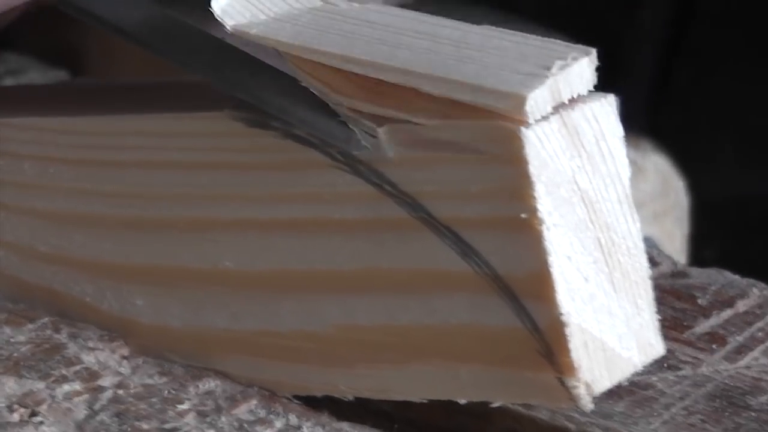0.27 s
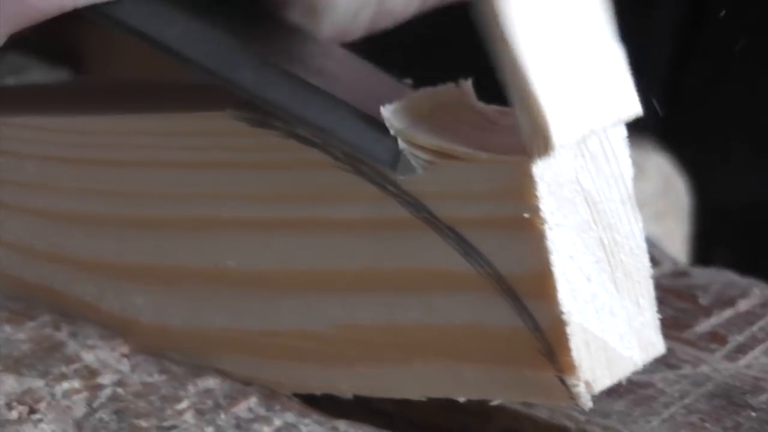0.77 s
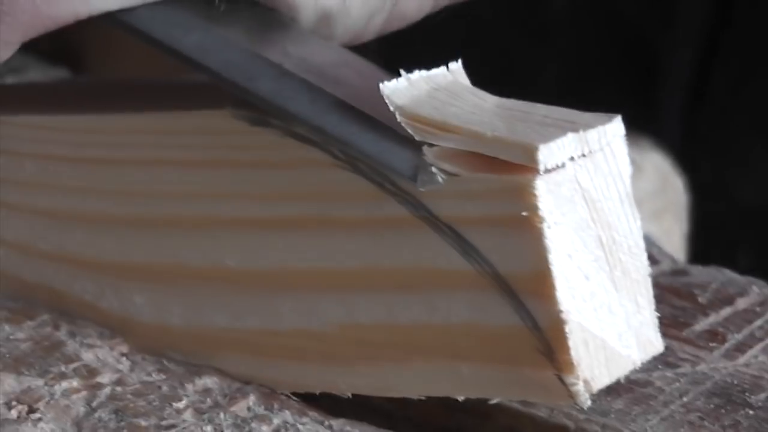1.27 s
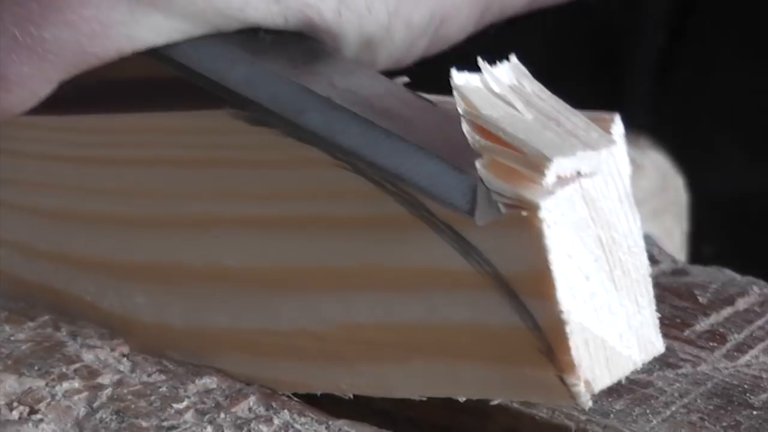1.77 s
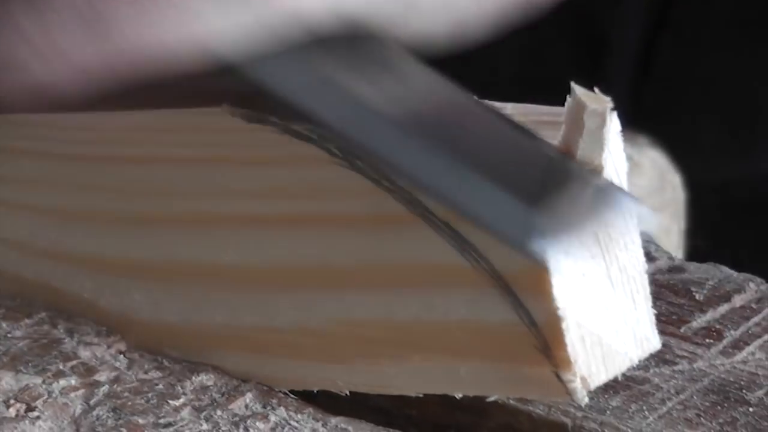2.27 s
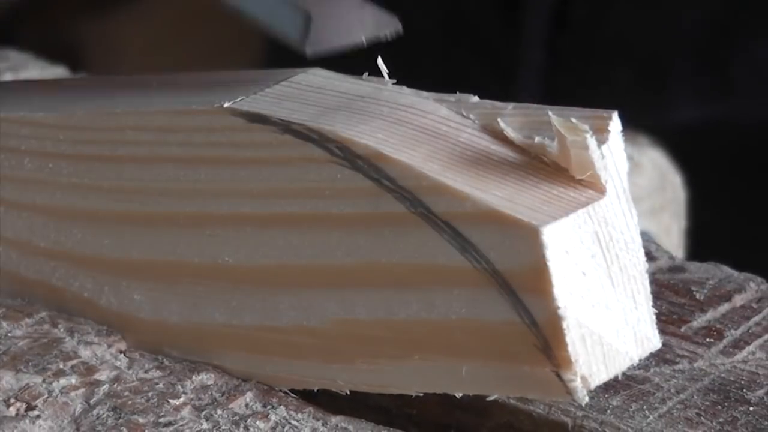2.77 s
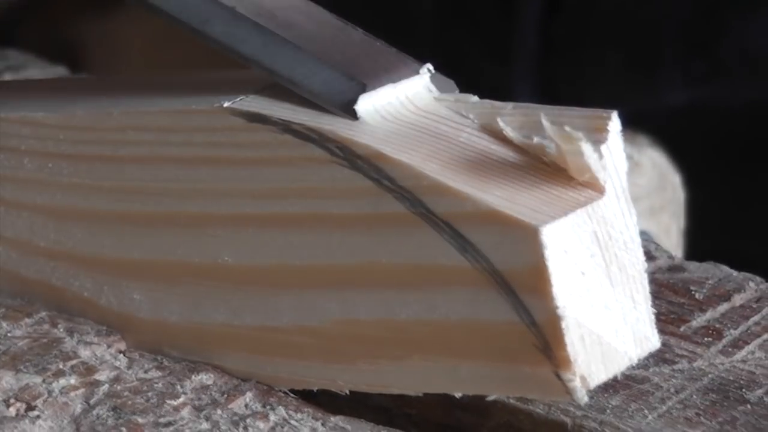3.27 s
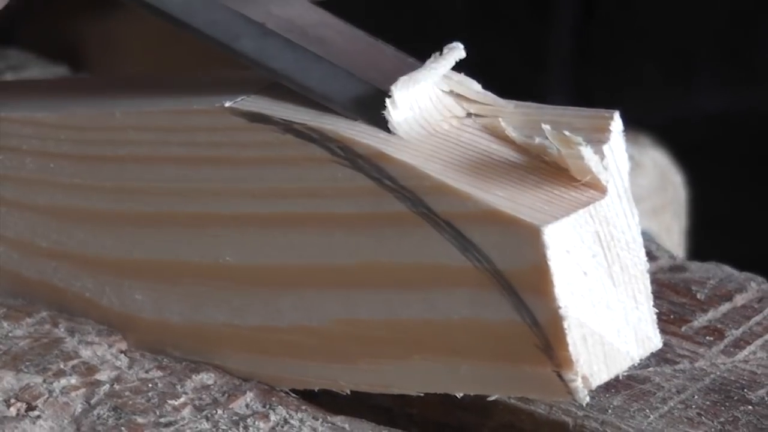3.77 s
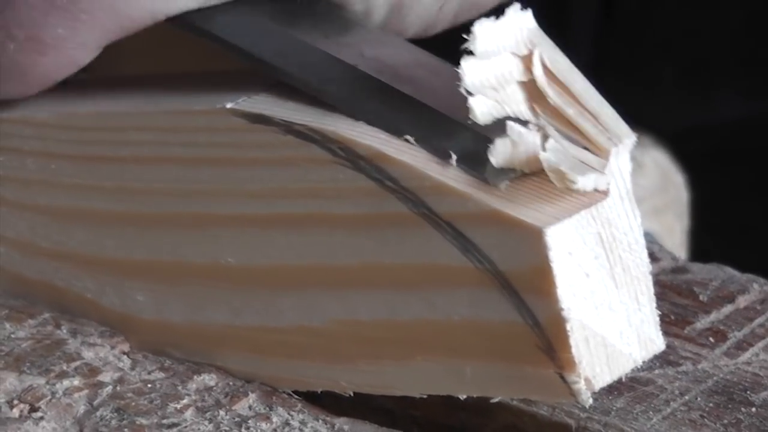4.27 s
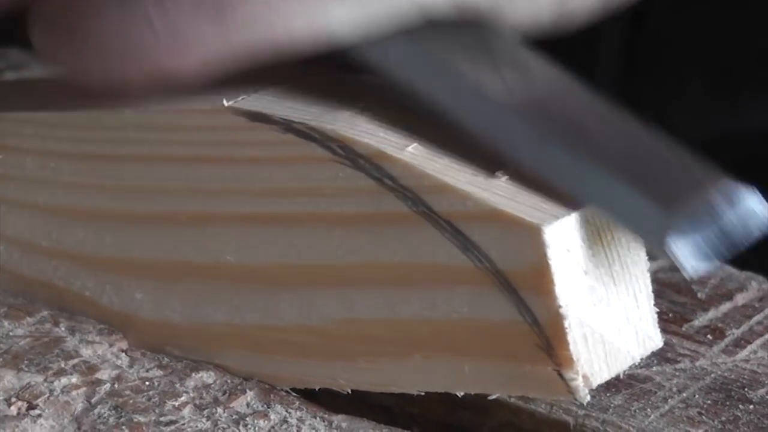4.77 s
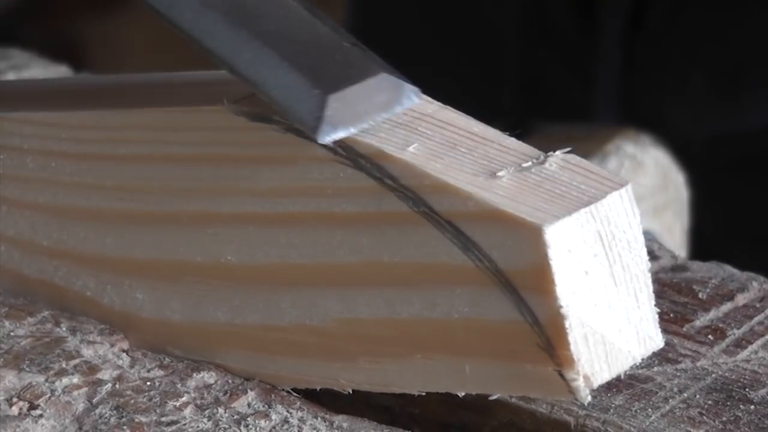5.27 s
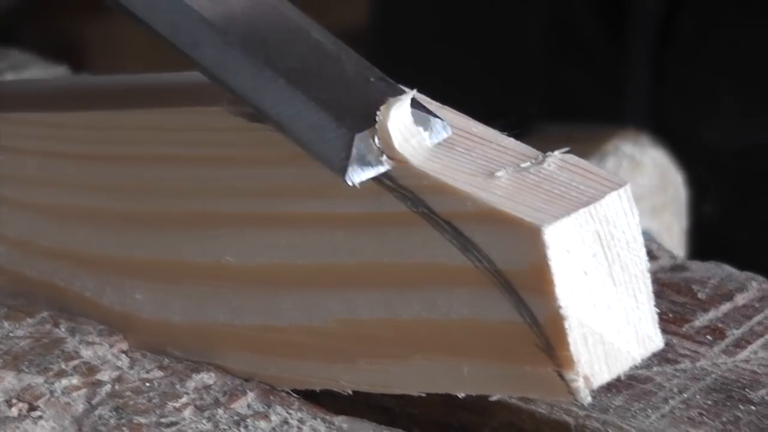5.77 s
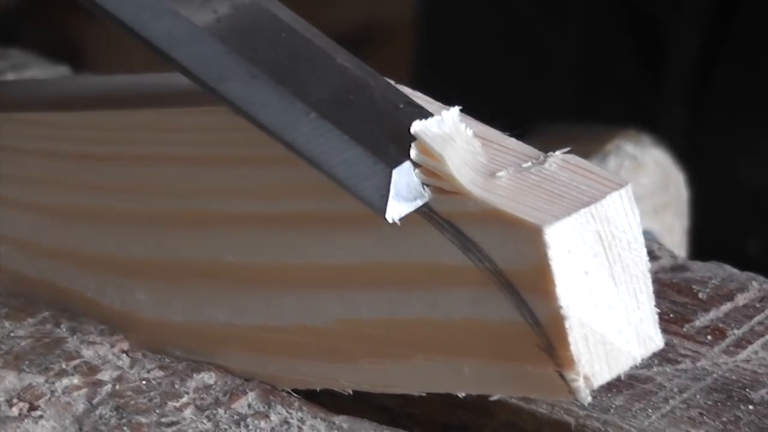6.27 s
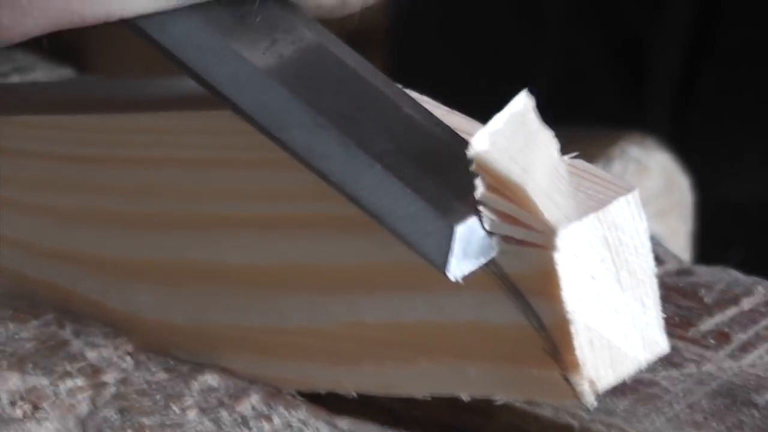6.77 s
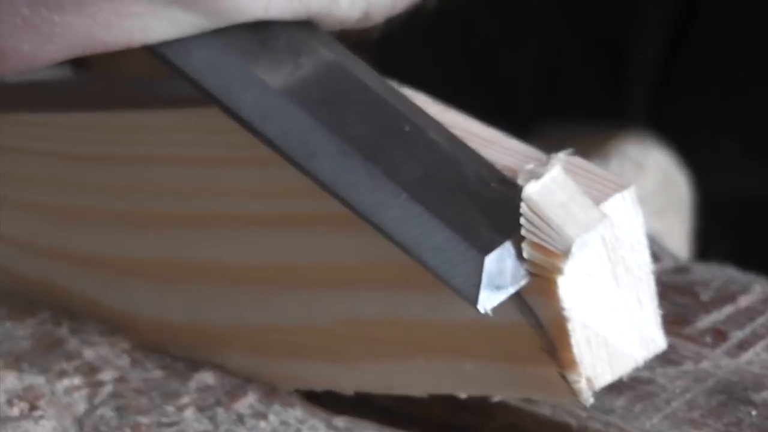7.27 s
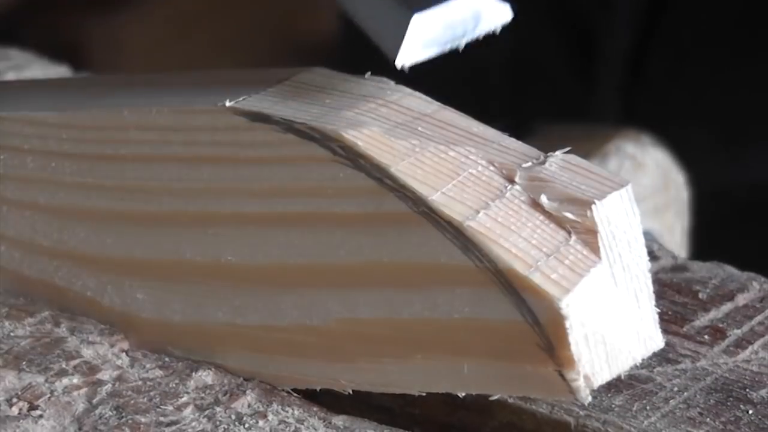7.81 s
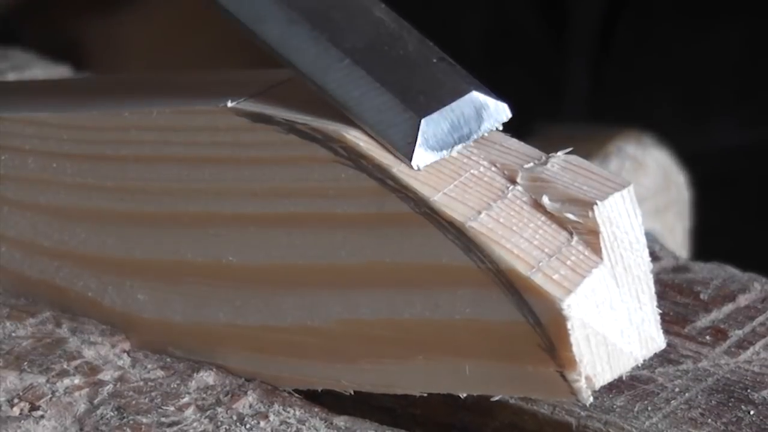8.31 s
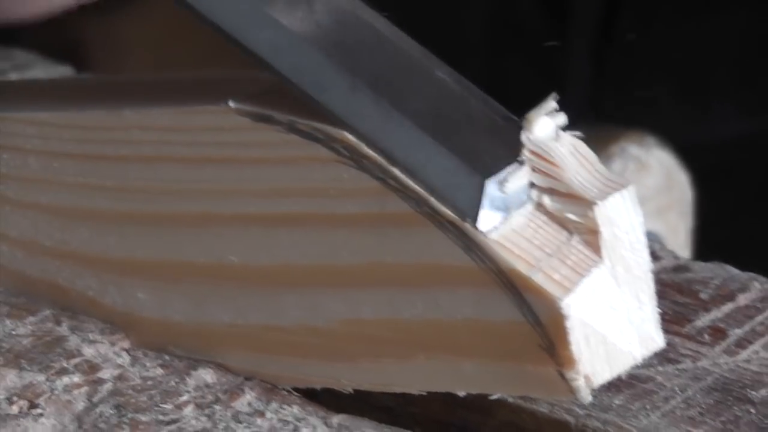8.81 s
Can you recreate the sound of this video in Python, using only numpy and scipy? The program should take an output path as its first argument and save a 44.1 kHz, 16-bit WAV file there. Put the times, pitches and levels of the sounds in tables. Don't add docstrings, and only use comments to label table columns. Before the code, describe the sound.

In a small workshop, heard close in stereo, a mallet drives a chisel through pine. Seven hard blows fall from 0 to 2.1 seconds, roughly every 0.35: sharp splitting crack, steely ring, hollow board and bench knock, short echo. After each, bench legs bump and a loose tool ticks in shortening bounces. A blade tap comes at 2.0, another with rasping around 2.9. Five blows follow from 3.3 to 4.6. In the pause, faint room noise and hum creep up, with soft scraping, chips ticking and a blade tap at 5.2. Six blows run from 5.75 to 7.5, with heavier rattling. At 7.9 a block lands with a softer, rounder wooden knock; the blade taps, squeaks and rasps until 8.4. Two last blows hit at 8.5 and 8.8, with bench thuds, small rattles and a fading echo.

```python
import sys
import numpy as np
from scipy import signal
from scipy.fft import rfft, irfft, next_fast_len
from scipy.io import wavfile
from scipy.ndimage import uniform_filter1d

SR = 44100
rng = np.random.default_rng(int(sys.argv[2]) if len(sys.argv) > 2 else 0)


def voltage_ratio(decibels):
    exponent = np.asarray(decibels, float) / 20
    return 10 ** exponent


def materialize(psi):
    bounded = np.clip(np.atleast_2d(psi).T, -1, 1)
    quanta = np.round(bounded * 32767).astype(np.int16)
    wavfile.write(sys.argv[1], SR, quanta)


N = 399105

# start_s, crack_db, bench_db, lingering_board_hz, lingering_board_db
BLOWS = [(0.0135, -9, -18.5, 2020, -6), (0.3626, -4.5, -27, 1176, -2), (0.7199, -7, -19, 1405, -1.5),
         (1.071, -10, -24, 1397, -1.5), (1.4042, -8, -24.5, 1160, -1), (1.7363, -9.5, -24, 1400, -5),
         (2.0994, -7, -29, 1480, -5), (3.2904, -7, -22, 1950, -6.5), (3.6062, -7.5, -27, 1440, -3.5),
         (3.931, -6, -31.5, 1400, 2.5), (4.2583, -6.5, -22.5, 1500, -8), (4.5981, -7.5, -40, 640, -17),
         (5.7531, -6, -20.5, 748, -5.5), (6.118, -6, -20, 2214, -4.5), (6.4701, -6, -20.5, 1400, -7),
         (6.812, -6, -18, 1700, -5), (7.1523, -5.5, -19.5, 1386, 1), (7.5049, -6, -21, 606, -8),
         (8.502, -6, -19, 1670, -0.5), (8.831, -4.5, -20, 1285, 1.5)]
# board_db, steel_db
LANDING = [(0.9, 3.5), (-1.3, 0.7), (2, -5.5), (-2.2, 2.5), (-0.5, 2.2), (-0.2, -0.8), (-1.5, 0.3),
           (1.5, -2.3), (-0.5, -1.5), (-1.5, -2), (-0.3, -1), (-1.6, -2.5), (0.3, -1), (0.3, -1), (0.1, 1),
           (-2.5, -1), (-3, 1.8), (-1.2, 2.2), (1, 0.8), (-2, -1.7)]
# start_s, level_db, bench_db, steel_rel_db, thump_db
TOUCHES = [(1.0567, -18.5, -23, 4.5, -46), (2.0145, -22, -24, 0, -68), (2.9609, -20, -23.5, 10.5, -35.5),
           (5.2048, -28, -17.5, 5, -77), (7.89, -26.5, -22, -1, -67), (8.1437, -30, -21, 15, -42)]

# centre_hz, width_hz, level_db
BENCH = [(108, 64, -3), (176.6, 38, 2), (216, 49, 1.5), (283.6, 35, -5), (342.4, 67, 6.5), (437, 245, 8),
         (467, 44, 4), (530, 68, -3)]
BOARD = [(761, 306, 3.5), (1004, 140, -1.5), (1346, 278, 6), (1616, 170, 2), (1951, 150, 1.5)]
HANDLE = [(2262, 310, -3.5), (2714, 680, -2.5), (3446, 860, -0.5), (4660, 1600, -5.5)]
STEEL = [(4900, 1350, -6), (6030, 1200, -7), (8100, 3530, -0.5), (9500, 1900, -13.5), (10920, 940, -9.5)]
BLOCK = [(198, 100, 3), (310, 270, -5), (520, 214, 2.5), (660, 94, 3), (1090, 85, -1), (1910, 210, -5),
         (2600, 130, -7), (4360, 2500, -26)]
# pitch_hz, level_db, t60_s
WOOD_MODES = [(166.26, -13, 0.48), (270.5, -9.5, 0.29), (356.5, -3.5, 0.22), (446, -2, 0.29),
              (486.4, -3.5, 0.4), (640, -8.5, 0.27), (746, -5, 0.24), (989, -4.5, 0.32), (1131, -5, 0.22),
              (1272, -12, 0.4), (1397, -8.5, .4), (1670, -8, 0.36), (1906, -8, 0.27), (2320, -9.5, 0.22)]
# start_s, level_db, pitch_hz
STEEL_RINGS = [(0.0144, -36, 4140), (1.056, -7, 5630), (1.2161, -38, 6300), (1.3568, -46, 6250),
               (1.4037, -9.5, 3630), (2.1006, -12, 3550), (2.1894, -31, 6100), (2.2498, -40, 6100),
               (2.3745, -51, 3390), (2.4638, -48.5, 6160), (3.6067, -19.5, 3480), (3.931, -23, 3480),
               (4.5984, -10, 3880), (5.2046, -24.5, 5600), (5.3682, -39, 4900), (5.674, -34, 3540),
               (5.7538, -6.5, 3280), (5.892, -34, 3970), (6.119, -9, 3560), (6.2652, -34, 3800),
               (8.1424, -30.5, 4690)]
# start_s, level_db, pitch_hz
BLADE_RING = [(2.885, -27, 2050), (2.965, -21, 2600), (3.931, -8, 1410), (4.5982, -8, 800),
              (4.5982, -17, 1045), (7.1521, -4, 1400), (0.3625, -10, 770), (2.1001, -8, 2180),
              (2.965, -26, 3080)]

# start_s, level_db
THUDS = [(2.06, -43), (2.414, -67.5), (3.096, -44.5), (3.147, -56), (3.633, -30), (3.956, -22.5),
         (5.609, -43), (5.986, -38), (6.06, -61), (6.343, -35.5), (6.753, -30.5), (6.969, -30),
         (7.067, -42.5), (7.333, -30.5), (7.422, -39), (8.668, -22), (8.992, -27.5)]
# start_s, level_db, pitch_hz
LEG_BUMPS = [(0.149, -45, 203), (0.499, -40, 191), (0.859, -41, 213), (1.218, -42, 202),
             (1.558, -39.5, 226), (1.899, -53, 202), (2.25, -64, 312), (2.885, -35, 300), (3.436, -37, 161),
             (3.536, -39, 310), (3.757, -40, 218), (4.085, -37, 216), (4.409, -36, 205), (5.202, -39, 297),
             (5.892, -30.5, 213), (5.984, -28.5, 202), (6.063, -38, 194), (6.268, -28.5, 216),
             (6.34, -32, 207), (6.62, -32.5, 390), (6.669, -31, 202), (6.753, -32, 198), (6.968, -31, 238),
             (7.331, -36, 200), (7.423, -37, 291), (7.69, -43, 342), (8.113, -32.5, 355), (8.669, -31, 363),
             (8.792, -23, 297), (8.988, -30.5, 199)]
# start_s, level_db, steel_rel_db
FIRST_LANDINGS = [(0.1472, -37.5, 5), (0.4988, -36.5, 6), (0.8614, -46, 15), (1.2167, -39, 5),
                  (1.5592, -42.5, 7.5), (1.8946, -47, 4.5), (2.2507, -43, 1), (3.4376, -40, 4),
                  (3.7594, -38, -5.5), (4.0866, -37.5, 1), (4.4099, -40, 2), (5.891, -33, 1.5),
                  (6.2672, -30.5, 2), (6.6185, -31, 7), (7.6904, -37, 2.5), (8.6852, -40.5, -3)]
SECOND_LANDINGS = [(0.2438, -39, 2.5), (0.603, -41, -3), (0.9637, -41, -1), (1.305, -43.5, -1),
                   (1.6392, -43, -11.5), (1.969, -44, -25), (2.3436, -41, -2), (3.5284, -39.5, 0),
                   (3.8404, -41.5, -4), (4.1634, -41.5, 0), (4.4878, -41.5, 0), (6.0015, -35, -1),
                   (6.3599, -35.5, -0.5), (6.6934, -42, 0), (8.7335, -41.5, -9)]
THIRD_LANDINGS = [(0.322, -45.5, 3), (0.665, -50.5, 3), (1.021, -47, 2), (1.381, -46.5, 2),
                  (3.596, -43.5, -4), (3.916, -42, -2), (4.242, -41.5, 0.5), (4.565, -41, 5),
                  (6.0744, -38, 5.5), (6.432, -38, 1.5), (6.778, -37, 1), (8.7926, -42, -11)]
# start_s, level_db, steel_rel_db
CHIPS = [(0.8774, -40, -14), (1.0516, -28, 3), (1.3565, -41, -16), (1.5864, -42.5, 13), (2.374, -39.5, 4),
         (2.8828, -38, 0), (3.455, -45, -25), (4.9287, -35.5, 4.5), (5.0946, -44.5, 0), (5.199, -41, -13),
         (5.367, -41.5, 1), (5.556, -54, 6), (5.907, -39, 1), (5.987, -45, -3), (6.283, -40, 1),
         (5.656, -39, 0), (5.726, -47, -12), (7.0129, -44, 0), (2.972, -47.5, 6.5), (3.1255, -61, -7),
         (3.2317, -45, -6), (7.3556, -49, -1), (7.4404, -48, -12), (8.4452, -48, -8), (8.1085, -33, -14.5),
         (8.8246, -40, 0.6)]

# start_s,
# hardest_s, end_s, hardest_db
SCRAPE = [(3.09, 3.13, 2.7, -72), (4.75, 4.945, 6.7, -57.5), (5.104, 5.184, 5.2, -59),
          (5.27, 5.353, 5.49, -51.5), (5.643, 5.669, 5.6, -51), (6.9, 6.95, 7.36, -50.5),
          (7.25, 7.3, 7.7, -51.5), (7.75, 7.83, 8.5, -52.5), (7.911, 7.915, 7.92, -39.5),
          (7.974, 8.003, 8.22, -51), (8.22, 8.335, 8.4, -46.5), (8.4, 8.423, 10, -54)]
# start_s, hardest_s, end_s, hardest_db
RASP = [(8.255, 8.29, 8.31, -54), (8.31, 8.34, 8.375, -48.5), (5.65, 5.66, 5.5, -55),
        (3.3, 2.92, 3.25, -48)]
# freq_hz, density_db
SCRAPE_COLOUR = [(150, 7), (400, 11), (1100, 9.5), (3000, -1), (5000, -5.5), (9000, -16.5), (13000, -13.5)]
RASP_COLOUR = [(1500, -18), (3300, 3), (6500, -5), (9300, 4), (12000, -10)]
# start_s, level_db, pitch_hz
SQUEAKS = [(3.436, -27, 4200), (4.409, -33, 4300), (5.326, -34, 3600), (5.526, -36, 1140),
           (8.161, -19.5, 2098), (8.263, -33, 2050), (8.276, -27, 3300), (8.326, -30, 3260),
           (8.331, -29, 2076)]

# freq_hz, t60_s, level_db, direct_side_minus_mid_db
ROOM = [(134, 1, -9.5, -7), (246, 0.89, 4, -13.5), (523, 0.6, -2.5, -6), (960, 0.23, 0.5, -5.5),
        (1790, 0.41, -5, -13), (3720, 0.39, -10, -25), (6400, 0.41, -3, -26), (10700, 0.4, -17, -11)]
# freq_hz, side_minus_mid_db
TAIL_SIDE = [(60, -17), (300, -17.5), (1900, -8), (2500, -19.5), (3000, -48), (10600, -52), (11200, -5),
             (12500, -6)]
# freq_hz, density_db
AIR = [(30, -16), (70, -10), (150, 6.5), (300, -0.5), (1100, -3.5), (2600, -10.5), (2900, -6.5),
       (6000, -17), (13000, -28.5)]
# freq_hz, side_minus_mid_db
AIR_SIDE = [(30, 6.5), (120, -7.5), (300, -3), (1200, -7), (2100, -12), (2800, -40), (10600, -48.5),
            (11400, -7.5)]
# pitch_hz, rms_db
HUM = [(100, -57), (274, -63), (1109, -66.5), (2850, -73)]

USUAL_CRACK_DB, BOARD_DB, STEEL_DB, ROOM_DB, THUMP_DB = -6.5, -4, -5.5, -3, -34.5
BOARD_FOLLOWS, STEEL_FOLLOWS, ROOM_FOLLOWS = 0.44, 0.7, 1
TOUCH_BOARD_DB, TOUCH_ROOM_DB = -14.5, 3.5
SNAP_HZ, SNAP_T60_S, BLOW_SNAP_DB, TOUCH_SNAP_DB = 4300, 0.006, -5, -2.5
WOOD_DB, WOOD_SIDE_DB = -30.5, -9
BLOCK_START_S, BLOCK_DB, BLOCK_ROOM_DB = 7.921, -10, -26
BLOCK_PUSH_S, BLOCK_RISE_S = 0.024, 0.0044
STROKE_START_DB, STROKE_END_DB = -15, -15.5
AIR_DB, AIR_SIDE_DB = -52.5, -59
DUCK_DB, RECOVER_DB_S, DUCK_ABOVE_DB = -18, 18, -15
NOTCH_HZ, NOTCH_WIDTH_HZ, NOTCH_SHARE = 2510, 210, 0.24
CEILING, TOP_HZ, ROOM_RIPPLE_DB = 1.1, 11750, 2.0


def blows():
    rows = []
    for (s, db, bench_db, *_), (board_db, steel_db) in zip(BLOWS, LANDING):
        excess_db = db - USUAL_CRACK_DB
        board = BOARD_DB + board_db + (BOARD_FOLLOWS - 1) * excess_db
        steel = STEEL_DB + steel_db + (STEEL_FOLLOWS - 1) * excess_db
        room = ROOM_DB + (ROOM_FOLLOWS - 1) * excess_db
        rows.append((s, db, bench_db - db, board, steel, room))
    return rows


def touches():
    return [(s, db, bench_db, TOUCH_BOARD_DB, steel_db, TOUCH_ROOM_DB)
            for s, db, bench_db, steel_db, _ in TOUCHES]


def knocks(table, push_s):
    s, db, bench_db, board_db, steel_db, _ = np.transpose(table)[:, :, None, None]
    count = len(s)
    sound = ring(HANDLE, count, push_s=push_s, rise_s=0.0013)
    sound = sound + voltage_ratio(steel_db) * ring(STEEL, count, push_s=0.72 * push_s, rise_s=0.0001)
    sound = sound + voltage_ratio(board_db) * ring(BOARD, count, push_s=1.6 * push_s, rise_s=0.00027)
    sound = sound + voltage_ratio(bench_db) * ring(BENCH, count, push_s=1.4 * push_s, rise_s=0.0026)
    out = np.zeros((2, N))
    add(out, s.ravel(), voltage_ratio(db) * sound)
    return out


def ring(modes, count, push_s, rise_s):
    t = np.arange(4096) / SR
    envelope = np.exp(-t / push_s) * (1 - np.exp(-t / rise_s))
    push = rng.standard_normal((count, 2, len(t))) * envelope
    out = 0
    for hz, width_hz, db in modes:
        side_db = room_at(hz)[2] - 2.5
        out = out + voltage_ratio(db + np.array([[0], [side_db]])) * narrow(push, hz, width_hz)
    return out / np.abs(out[:, :1]).max(axis=2, keepdims=True)


def snaps():
    t, out = np.arange(512) / SR, np.zeros((2, N))
    shape = np.sin(2 * np.pi * SNAP_HZ * t * (1 - t / 0.013)) * voltage_ratio(-60 * t / SNAP_T60_S)
    rows = [(r[0], r[1] + BLOW_SNAP_DB) for r in BLOWS]
    rows += [(r[0], r[1] + TOUCH_SNAP_DB) for r in TOUCHES]
    add(out[0], [s + 0.0006 for s, _ in rows], [voltage_ratio(db) * shape for _, db in rows])
    return out


def thumps():
    phase, out = np.arange(2048) / SR / 0.00048, np.zeros((2, N))
    rows = [(r[0], THUMP_DB) for r in BLOWS] + [(r[0], r[4]) for r in TOUCHES]
    lean = np.sign(rng.standard_normal(len(rows))) * voltage_ratio(-7)
    shape = phase * np.exp(1 - phase)
    sounds = [voltage_ratio(db + 16.5) * np.outer([1, k], shape) for (_, db), k in zip(rows, lean)]
    add(out, [s + 0.0024 for s, _ in rows], sounds)
    return out


def wood_modes():
    t, out = np.arange(12288) / SR, np.zeros((2, N))
    hz, db, t60_s = np.transpose(WOOD_MODES)[:, :, None]
    swell = voltage_ratio(db - 60 * t / t60_s) * (1 - np.exp(-t / 0.0052))
    gain = voltage_ratio(WOOD_DB + np.array([[0], [WOOD_SIDE_DB]]))
    chances = rng.standard_normal((len(BLOWS), 4, len(hz), 1))
    for (s, *_), chance in zip(BLOWS, chances):
        turn = 2 * np.pi * (hz * (1 + 0.012 * chance[0]) * t + chance[1])
        tones = swell * np.sin(turn)
        mix_chance = chance[2:, :, 0]
        mix = voltage_ratio(2.5 * mix_chance) * np.sign(mix_chance)
        add(out, [s], [gain * (mix @ tones)])
    return out * flutter(size=300, depth_db=2.5)


def lingering(table, width_hz, t60_s, rel_db):
    t, out = np.arange(12288) / SR, np.zeros(N)
    noise = rng.standard_normal((len(table), len(t)))
    decay = voltage_ratio(-60 * t / t60_s) * (1 - np.exp(-t / 0.00045)) * np.sqrt(SR / width_hz)
    sounds = [voltage_ratio(db + rel_db) * narrow(n, hz, width_hz) * decay for n, (_, db, hz) in zip(noise, table)]
    add(out, [r[0] for r in table], sounds)
    return out


def block():
    out = np.zeros((2, N))
    sound = ring(BLOCK, count=1, push_s=BLOCK_PUSH_S, rise_s=BLOCK_RISE_S)
    add(out, [BLOCK_START_S], voltage_ratio(BLOCK_DB) * sound)
    return out


def thuds():
    return [(s, db - 33.5, 30, 11.0, -3.0, -1.5) for s, db in THUDS]


def ticks():
    kinds = [(FIRST_LANDINGS, -10.5, -5.5, 2.7), (SECOND_LANDINGS, -8.5, -4.5, 2.6),
             (THIRD_LANDINGS, 0, 0.3, 0.6), (CHIPS, -19, -7, 1.1)]
    return [(s, db, bench_db, board_db, steel_db, room_db)
            for rows, bench_db, board_db, room_db in kinds for s, db, steel_db in rows]


def scrape():
    grit = rng.standard_normal(N) * flutter(size=60, depth_db=2.2) * flutter(size=500, depth_db=1.2)
    slide = level(shaped(grit, SCRAPE_COLOUR), 0) * strokes(SCRAPE)
    rasp = level(shaped(grit, RASP_COLOUR), 0) * strokes(RASP)
    return slide + rasp


def strokes(table):
    t, size = np.arange(N) / SR, np.zeros(N)
    for *s, db in table:
        press_db = np.interp(t, s, [STROKE_START_DB, 0, STROKE_END_DB])
        size += voltage_ratio(db + press_db) * (t > s[0] - 0.03) * (t < s[-1] + 0.02)
    return uniform_filter1d(size, size=600)


def workshop(table, wet_db):
    s, db, bench_db, board_db, steel_db, room_db = np.transpose(table)
    db = db + room_db + wet_db
    clumps = flutter(size=100, depth_db=2.0)
    bench = diffuse(BENCH, s, db + bench_db + 4.0, shorten=0.68) * flutter(size=500, depth_db=1.2)
    board = diffuse(BOARD, s, db + board_db, shorten=0.94)
    handle = diffuse(HANDLE, s, db + 2.0, shorten=0.76)
    steel = diffuse(STEEL, s, db + steel_db, shorten=0.57)
    return bench + clumps * (board + handle + steel)


def diffuse(modes, times_s, db, shorten):
    out, at = 0, (times_s * SR).astype(int)
    noise = rng.standard_normal((2, N + 4096))
    uneven_db = 1.1 * rng.standard_normal((len(times_s), len(modes)))
    for k, (hz, width_hz, mode_db) in enumerate(modes):
        t60_s, room_db, _ = room_at(hz)
        hits = np.bincount(at, voltage_ratio(2 * (db + uneven_db[:, k])), N)
        fall = voltage_ratio(-120 / (shorten * t60_s * SR))
        energy = signal.lfilter([0.006], np.convolve([1, -1 + 0.0078], [1, -fall]), hits)
        size = np.sqrt(np.abs(energy) * SR / width_hz / len(modes)) * voltage_ratio(mode_db + room_db)
        out = out + narrow(noise[:, 500 * k:][:, :N], hz, width_hz) * size
    return out


def room_at(hz):
    room_hz, *columns = np.transpose(ROOM)
    return [np.interp(np.log(hz), np.log(room_hz), c) for c in columns]


def room_modes(x, depth_db):
    ripple_db = level(uniform_filter1d(rng.standard_normal(2049), size=4), 0) * depth_db
    ripple_db *= np.minimum(np.arange(2049) / 60, 1)
    cepstrum = irfft(np.log(voltage_ratio(ripple_db)))
    cepstrum = np.concatenate([cepstrum[:1], 2 * cepstrum[1:2048], np.zeros(2048)])
    response = irfft(np.exp(rfft(cepstrum)))
    return signal.oaconvolve(x, response[None] / np.linalg.norm(response), axes=1)[:, :N]


def background():
    mid = level(coloured(AIR, (N,)), AIR_DB)
    hz, side_db = np.transpose(AIR_SIDE)
    air_hz, density_db = np.transpose(AIR)
    air_db = np.interp(np.log(hz), np.log(air_hz), density_db)
    side = level(coloured(np.transpose([hz, air_db + side_db]), (N,)), AIR_SIDE_DB)
    t = np.arange(N) / SR
    drift = np.cumsum(rng.standard_normal((len(HUM), N)), axis=1) * 0.018
    hum = sum(np.sqrt(2) * voltage_ratio(db) * np.sin(2 * np.pi * pitch_hz * t + d)
              for (pitch_hz, db), d in zip(HUM, drift))
    return (mid + hum + np.array([side, -side])) * creeping_gain()


def creeping_gain():
    t = np.arange(N) / SR
    hard_s = np.array([-0.3] + [s for s, db, *_ in BLOWS if db > DUCK_ABOVE_DB])
    since_s = t - hard_s[np.searchsorted(hard_s, t) - 1]
    return voltage_ratio(np.minimum(DUCK_DB + RECOVER_DB_S * since_s, 0))


def level(x, db):
    return x * voltage_ratio(db) / np.sqrt(np.mean(x ** 2))


def band(x, hz, width_hz):
    return signal.lfilter(*signal.iirpeak(hz, hz / width_hz, fs=SR), x)


def narrow(x, hz, width_hz):
    return band(band(x, hz, 1.57 * width_hz), hz, 1.57 * width_hz)


def shaped(x, points):
    hz, db = np.transpose(points)
    size = next_fast_len(len(x))
    bins_hz = np.maximum(np.arange(size // 2 + 1) * SR / size, 1)
    gain = voltage_ratio(np.interp(np.log(bins_hz), np.log(hz), db))
    return irfft(rfft(x, size) * gain, size)[:len(x)]


def coloured(points, shape):
    return shaped(rng.standard_normal(shape), points)


def flutter(size, depth_db):
    lumps = uniform_filter1d(uniform_filter1d(rng.standard_normal(N), size), size)
    return voltage_ratio(depth_db * level(lumps, 0))


def add(track, times_s, sounds):
    for s, sound in zip(times_s, sounds):
        i = int(s * SR)
        track[..., i:i + sound.shape[-1]] += sound[..., :N - i]


def scene():
    small = ticks() + thuds()
    near = knocks(blows(), push_s=0.0023) + knocks(touches(), push_s=0.0017)
    near = near + voltage_ratio(-2.0) * knocks(small, push_s=0.0024)
    near = near + block() + thumps() + wood_modes() + snaps()

    echoes = room_modes(workshop(blows() + touches() + small, wet_db=-12.5), ROOM_RIPPLE_DB)
    echoes = echoes + diffuse(BLOCK, np.array([BLOCK_START_S]), np.array([BLOCK_ROOM_DB]), shorten=0.59)
    mid = near[0] + echoes[0]
    side = near[1] + shaped(echoes[1], TAIL_SIDE)

    board_rings = [(s, db, hz) for s, _, _, hz, db in BLOWS] + BLADE_RING
    mid = mid + lingering(board_rings, width_hz=122, t60_s=0.29, rel_db=-27)
    mid = mid + lingering(STEEL_RINGS, width_hz=460, t60_s=0.083, rel_db=-15.0)
    mid = mid + lingering(LEG_BUMPS, width_hz=77, t60_s=0.44, rel_db=-10.5)
    mid = mid + lingering(SQUEAKS, width_hz=240, t60_s=0.1, rel_db=-22)
    side = side + lingering(LEG_BUMPS, width_hz=160, t60_s=0.2, rel_db=-26.5)
    return np.array([mid + side, mid - side]) + scrape() + background()


def low_pass(x):
    return signal.sosfilt(signal.butter(12, 12960, fs=SR, output="sos"), x)


def record(dry):
    heard = dry - NOTCH_SHARE * band(dry, NOTCH_HZ, NOTCH_WIDTH_HZ)
    limited = CEILING * np.tanh(heard / CEILING)
    top_cut = signal.cheby1(10, 0.5, TOP_HZ, fs=SR, output="sos")
    mix = signal.sosfilt(top_cut, limited)
    return low_pass(mix)


dry = scene()
out = record(dry)
materialize(out)
```